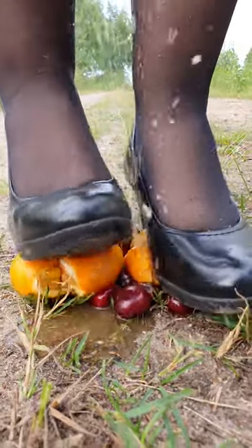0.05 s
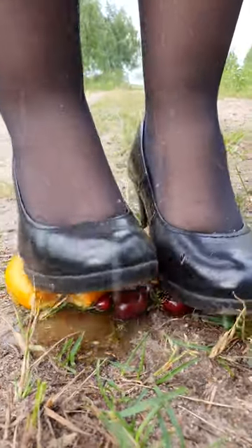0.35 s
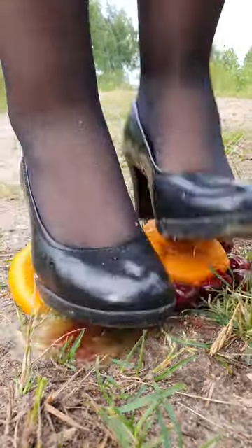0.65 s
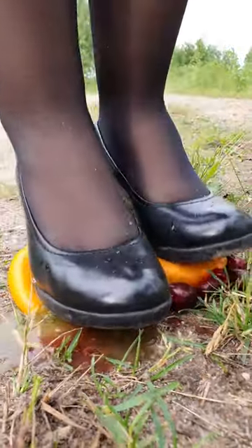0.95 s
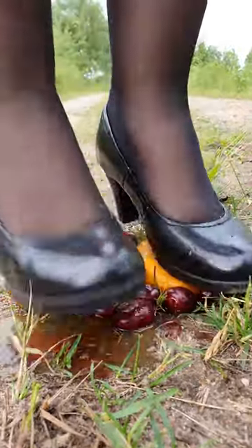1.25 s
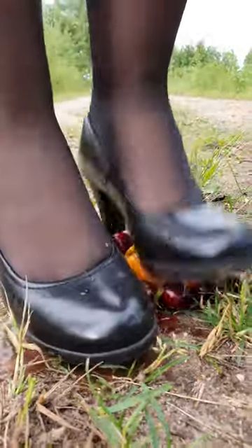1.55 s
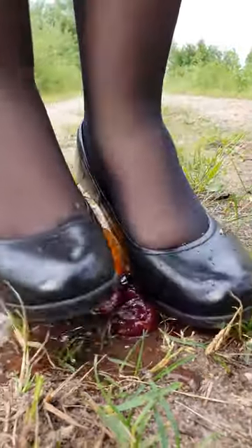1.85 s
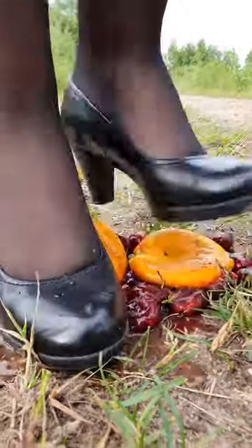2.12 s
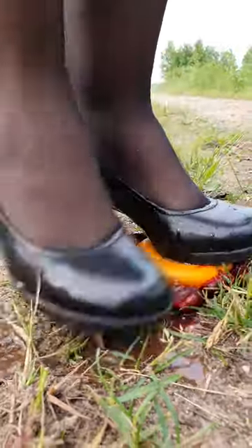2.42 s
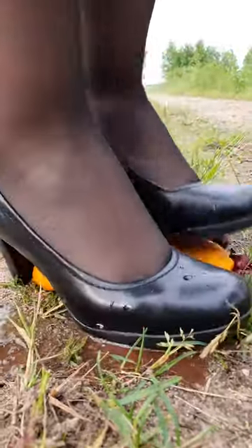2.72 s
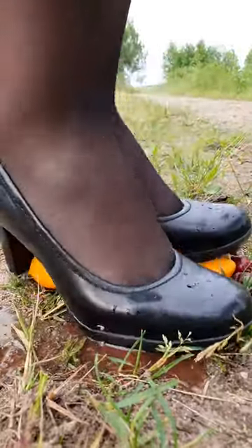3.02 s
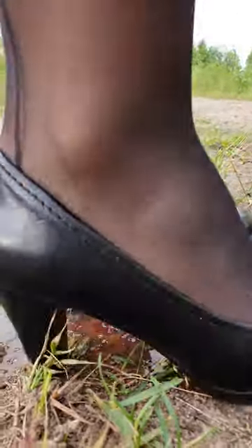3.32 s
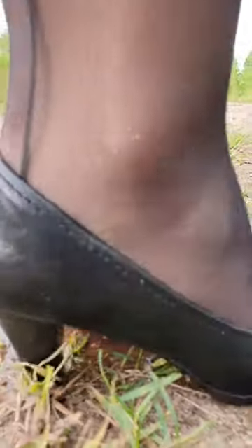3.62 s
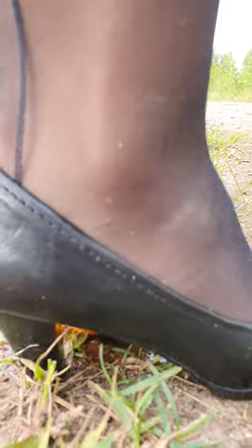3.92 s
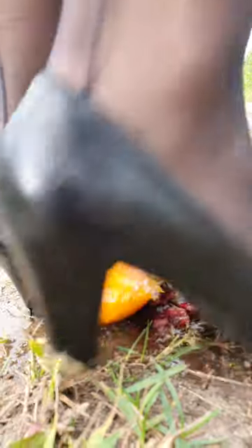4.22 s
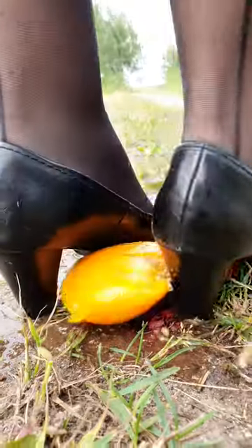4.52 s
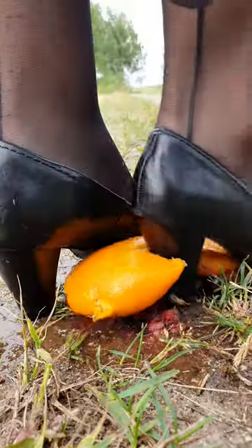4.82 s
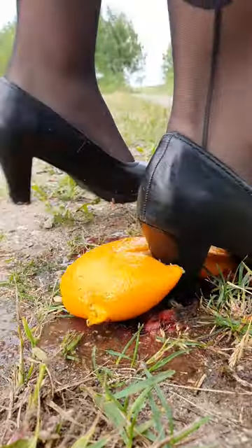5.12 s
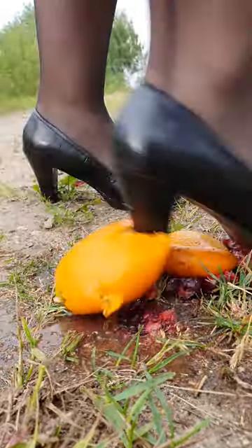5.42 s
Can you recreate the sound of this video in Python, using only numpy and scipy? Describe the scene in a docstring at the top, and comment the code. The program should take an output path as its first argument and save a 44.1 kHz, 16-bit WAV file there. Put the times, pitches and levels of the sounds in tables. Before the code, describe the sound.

High-heeled shoes squish oranges and cherries into sandy ground close by, with wet crackles, pops and heel thuds, while a small bird warbles faintly.

```python
"""High-heeled shoes tread oranges and cherries into sandy ground, close by, over a low outdoor rumble.
From the start soles grind sand, wet pulp crackles and squirts, air pockets pop and peel snaps.
A small bird warbles further off, loudest near 1 s, while a distant vehicle fades.
Heels thud at 2.0, 3.3 and 4.1 s. The treading grows lighter; the bird trills and sings on faintly."""
import sys
import numpy as np
from scipy import signal
from scipy.fft import rfft, irfft, next_fast_len
from scipy.io import wavfile
from scipy.ndimage import map_coordinates

SR = 44100
rng = np.random.default_rng(int(sys.argv[2]) if len(sys.argv) > 2 else 0)


def dump(signal):
    """Clip the signal to [-1, 1] and save it as 16-bit WAV at the path in sys.argv[1]."""
    limited = np.clip(np.atleast_2d(signal).T, -1, 1)
    pcm = np.round(limited * 32767).astype(np.int16)
    wavfile.write(sys.argv[1], SR, pcm)


N = 245195

# a foot leans on the fruit: (time [s], hold [s], sand [dB], pulp [dB], froth [dB])
FOOT_PRESSES = [(0, 0.062, -51.5, -52, -59.5), (0.147, 0.44, -68, -57.5, -75),
                (0.419, 0.086, -63, -54.5, -58), (0.531, .14, -58.5, -51.5, -60.5),
                (0.686, 0.073, -70, -58.5, -68.5), (0.803, 0.06, -64.5, -52.5, -65),
                (0.916, .29, -56, -48, -63.5), (0.977, 0.043, -69, -47.5, -60),
                (1.239, 0.13, -57.5, -54, -71), (1.379, 0.062, -60.5, -49, -53),
                (1.48, 0.22, -56.5, -48.5, -68.5), (1.731, 0.073, -57.5, -52, -66),
                (1.831, 0.011, -64, -56, -56.5), (1.94, 0.072, -51.5, -47, -61),
                (2.252, 0.009, -52, -52.5, -56), (2.307, 0.045, -59.5, -58.5, -78),
                (2.369, 0.046, -52, -50, -61.5), (2.57, 0.069, -50, -50.5, -56),
                (2.691, 0.19, -61, -59, -88), (2.913, 0.042, -56.5, -55.5, -68.5),
                (3.023, 0.17, -65, -55.5, -70.5), (3.191, 0.072, -65, -60.5, -68),
                (3.261, 0.028, -52, -58, -67), (3.378, 0.21, -61, -62.5, -79),
                (3.563, 0.042, -54, -59.5, -64), (3.675, 0.1, -64, -64, -72),
                (4.097, 0.28, -65.5, -66, -78), (4.178, 0.055, -59, -63, -69),
                (4.426, 0.03, -56, -55.5, -62.5), (4.524, 0.17, -64, -65.5, -75.5),
                (4.726, 0.12, -55, -60, -65), (4.928, 0.12, -62, -64, -77), (5.261, 0.16, -69.5, -66, -84),
                (5.386, 0.13, -60.5, -64.5, -75.5)]
# spectra under the sole: (frequency [Hz], density [dB])
SAND_SPECTRUM = [(100, -64), (220, 0.5), (400, 3.5), (750, 2.5), (1200, 2), (2000, -26), (5000, -54)]
PULP_SPECTRUM = [(400, -28), (1000, 1.5), (1600, 2.5), (2400, -2), (3300, 0.5), (4500, -2), (6500, -5.5),
                 (8000, -19), (12000, -35)]
FROTH_SPECTRUM = [(3000, -18), (6500, 11), (8200, -8), (11000, -1.5), (15500, -1.5), (17000, -7)]
# juice forced out: (time [s], level [dB], centre [Hz], width [octaves], decay [s])
JUICE_SQUIRTS = [(.003, -43.5, 2500, .94, .032), (0.193, -46.5, 2700, 1.02, 0.02),
                 (0.616, -29, 3030, 0.41, 0.0086), (0.63, -35, 3120, .65, 0.019),
                 (0.644, -40.5, 1930, 0.82, 0.023), (0.9845, -27, 3320, 0.69, 0.0059),
                 (1.1, -44, 1630, 0.69, 0.026), (1.309, -39.5, 3230, .79, .022),
                 (1.342, -36, 3520, .51, .006), (1.433, -38.5, 5870, 1.26, 0.021),
                 (1.466, -38.5, 2220, 0.48, 0.043), (1.485, -44.5, 4560, 0.077, 0.023),
                 (1.594, -37, 2590, 1.4, .019), (1.618, -41, 3150, 0.78, 0.036),
                 (1.7355, -39, 4370, .51, 0.0066), (1.943, -41, 2100, 1.35, 0.032),
                 (1.974, -38, 2350, 2.05, 0.021), (2.040, -33, 4080, 1.29, .008),
                 (2.252, -40, 2840, 0.86, 0.029), (2.322, -44, 1180, 1.5, 0.013),
                 (2.379, -36.5, 3300, 1.1, .006), (2.395, -35, 5700, 0.51, 0.0061),
                 (2.582, -46, 2390, 1.93, 0.032), (2.647, -44.5, 1620, 1.7, 0.015),
                 (2.845, -44, 1550, 1.17, 0.0081), (2.919, -26.5, 1480, 1.34, .0085),
                 (2.922, -33.5, 2960, 0.75, .011), (3.087, -41, 3500, .55, 0.0046),
                 (4.083, -37.5, 1094, 1.17, 0.011), (4.2, -45.5, 1114, 1.2, .014),
                 (4.416, -49, 1040, 0.9, 0.046), (4.426, -41.5, 4530, 0.32, .019),
                 (4.728, -48.5, 1190, 0.73, .028), (5.013, -50.5, 1930, 0.41, 0.032)]
# air pockets bursting: (peak time [s], level [dB], pitch [Hz])
AIR_POPS = [(.4294, -28, 483), (1.3144, -25, 653), (1.3195, -23, 5700), (1.3292, -19.5, 1870),
            (1.5944, -30.5, 710), (1.7481, -26.5, 3980), (1.9297, -29, 730), (1.9802, -21.5, 2040),
            (1.9963, -23, 6200), (2.2503, -24.5, 800), (2.2641, -32, 780), (2.3317, -32, 980),
            (2.6222, -28.5, 724), (2.6543, -32, 640), (2.7256, -31, 694), (2.9163, -30, 604),
            (2.9245, -22.5, 600), (2.9307, -24.5, 890), (3.772, -37.5, 725), (4.36, -43.5, 960),
            (4.939, -41.5, 816)]
# heel strikes: (time [s], thud [dB], thud [Hz], sole delay [s], sole [dB], sole [Hz])
HEEL_STRIKES = [(1.9734, -24, 214, .014, -24, 850), (3.2714, -25.5, 123, 0.023, -28, 71),
                (4.0791, -21, 215, .0088, -22, 1080)]
# peel and dry stalks breaking: (time [s], level [dB])
PEEL_SNAPS = [(0.4292, -28.5), (1.3192, -22), (1.328, -29), (1.599, -57), (4.0763, -29.5), (4.489, -33),
              (4.86, -33)]
# bird calls: (time [s], length [s], start pitch [Hz], end pitch [Hz], level [dB])
BIRD_SYLLABLES = [(.278, 0.044, 3600, 3270, -64), (.329, 0.082, 2750, 4070, -60),
                  (.732, 0.044, 4450, 3140, -51.5), (.88, 0.084, 3180, 3610, -44.5),
                  (.951, 0.036, 4320, 3640, -41.5), (1.063, 0.028, 3760, 3270, -46),
                  (1.16, 0.028, 2670, 2510, -49), (1.201, 0.029, 3040, 2960, -45.5),
                  (1.284, 0.032, 3950, 3390, -45.5), (1.408, 0.037, 4350, 3470, -48.5),
                  (1.84, 0.046, 2750, 2420, -52), (1.909, 0.016, 4540, 4150, -48),
                  (2.06, .035, 2060, 1940, -58.5), (2.117, 0.016, 3000, 2830, -63),
                  (2.744, 0.049, 2600, 4100, -62.5), (4.139, 0.03, 4100, 3350, -67),
                  (4.26, 0.043, 4650, 3900, -65), (4.863, 0.091, 2530, 4070, -64.5),
                  (5.047, 0.023, 3930, 3540, -60.5), (5.08, 0.034, 3950, 3960, -70),
                  (5.172, .03, 3970, 3530, -69.5), (5.296, .035, 3900, 3650, -66),
                  (5.333, .07, 3940, 3750, -65), (5.426, 0.03, 3900, 3500, -63)]
BIRD_TRILLS = [(3.85, 0.25, 3690, 2960, -73), (4.35, .068, 3180, 3150, -68), (4.48, .168, 3280, 3170, -68)]
# tyre noise and open-air rumble: (time [s], level [dB])
TYRE_LEVELS = [(0, -56), (1.1, -55.5), (1.8, -62.5), (2.2, -66), (5.56, -79)]
RUMBLE_LEVELS = [(0, -61.5), (1.4, -54), (2.1, -58), (2.9, -58.5), (3.65, -55), (4.5, -52), (5.15, -61.5),
                 (5.56, -58.5)]
# their spectra: (frequency [Hz], density [dB])
TYRE_SPECTRUM = [(200, 6.5), (500, -44), (750, -7), (980, 5), (1300, -9), (3000, -46), (8000, -42)]
RUMBLE_SPECTRUM = [(15, -31), (30, -4.5), (48, 1.5), (75, 4.5), (110, -3), (165, -5), (240, -18.5),
                   (500, -30.5), (1500, -57)]
# scatter off grass and legs: (frequency [Hz], T60 [s])
SCATTER_DECAY = [(200, 0.091), (2000, 0.1), (10000, 0.065)]
# left-right likeness: (frequency [Hz], correlation [ratio])
STEREO_CORRELATION = [(30, 0.99), (120, 0.94), (500, 0.93), (1000, 0.77), (2000, 0.67), (4000, 0.18),
                      (8000, 0.33), (14000, 0.11)]
# microphone balance: (frequency [Hz], right minus left [dB])
MIC_BALANCE = [(100, 1), (400, 2.5), (1000, 2), (2000, 6), (4000, 5.5), (7000, 26), (11000, 3),
               (15000, -0.5)]


def treading():
    """Under the soles sand grinds, pulp hisses with a few stronger bubbles, juice fizzes in clumps."""
    _, _, sand_db, pulp_db, froth_db = np.transpose(FOOT_PRESSES)
    grit = grains(N, per_s=900, hz=666, octaves=1, cycles=0.8, scatter_db=4)
    bubbles = grains(N, per_s=5000, hz=3000, octaves=0.9, cycles=2, scatter_db=2.5)
    bubbles += 0.6 * grains(N, per_s=70, hz=2800, octaves=0.7, cycles=4, scatter_db=3.5)
    fizz = grains(N, per_s=1500, hz=11100, octaves=0.322, cycles=24, scatter_db=2)
    sand = coloured(grit + 1.4 * noise(), SAND_SPECTRUM)
    pulp = coloured(bubbles + 0.8 * noise(), PULP_SPECTRUM)
    froth = coloured(fizz + 0.63 * noise(), FROTH_SPECTRUM)
    sand *= pressure(sand_db, rest_db=-70.5, release_db_per_s=199)
    pulp *= pressure(pulp_db, rest_db=-75, release_db_per_s=199)
    froth *= pressure(froth_db, rest_db=-90, release_db_per_s=256)
    clumps = wobble(35)
    return sand * amp(2.07 * clumps) + pulp * amp(1.47 * clumps) + froth * amp(4.3 * clumps)


def pressure(levels_db, rest_db, release_db_per_s, attack_s=0.015, sag_db_per_s=18):
    """Gain over all presses: the weight comes on, the fruit slowly gives way, the foot lets go."""
    power = np.full(N, amp(rest_db) ** 2)
    for (s, hold_s, *_), db in zip(FOOT_PRESSES, levels_db):
        t = np.arange(N) / SR - s
        rise = np.clip(t / attack_s + 0.5, 0, 1)
        fall_db = sag_db_per_s * np.clip(t, 0, hold_s) + release_db_per_s * np.maximum(t - hold_s, 0)
        power += (rise * amp(db - fall_db)) ** 2
    return np.sqrt(power)


def grains(size, per_s, hz, octaves, cycles, scatter_db):
    """Tiny bubbles or slipping grains: random damped sines, rising slightly in pitch as they die."""
    count = int(per_s * size / SR) + 1
    start = rng.integers(0, size, (count, 1))
    pitch_hz = np.clip(hz * 2 ** (octaves * rng.standard_normal((count, 1))), 150, SR / 2.5)
    strength = amp(scatter_db * np.minimum(rng.exponential(size=(count, 1)), 4)) * np.sqrt(pitch_hz)
    step = np.arange(192)
    age = step / len(step)
    turns = pitch_hz * step / SR * (1 + 0.11 * age)
    envelope = strength * np.exp(-turns / cycles) * (1 - np.exp(-2 * turns)) * (1 - age)
    waves = envelope * np.sin(2 * np.pi * turns)
    positions = (start + step).ravel()
    pair = [waves * rng.choice([-1, 1], (count, 1)) for _ in range(2)]
    return unit_rms(np.array([np.bincount(positions, x.ravel(), size)[:size] for x in pair]))


def squirts(tear_s=0.0019):
    """A tearing cell spits bubbles; sound bouncing in the wet gap under the sole gives a hollow pitch."""
    out = np.zeros((2, N))
    damping_db = [(150, 13), (400, 3), (6500, -1.5), (8000, -11), (15000, -0.5)]
    for s, db, hz, octaves, decay_s in JUICE_SQUIRTS:
        def wet_gap(f):
            band = 1 / np.hypot(1, np.log2((f + 1) / hz) / (1.5 * octaves))
            bounce = 1 / (1 - 0.35 * np.exp(-4j * np.pi * f / hz))
            return amp(at_hz(damping_db, f)) * band * bounce
        t = np.arange(int(3 * decay_s * SR)) / SR
        bubbles = grains(len(t), per_s=6000, hz=hz, octaves=octaves, cycles=1.73, scatter_db=3)
        envelope = (1 - np.exp(-t / tear_s)) * np.exp(-(t / (1.09 * decay_s)) ** 2)
        add(out, s, amp(db) * envelope * unit_rms(filtered(bubbles, wet_gap)))
    return out


def pops():
    """Air pockets in the fruit burst, each with one damped swing."""
    return swings(AIR_POPS)


def heels(touch_lead_s=0.00708, touch_hz=603, knock_hz=384):
    """The tip touches; the ground thuds and the heel knocks together; the sole follows."""
    out = np.zeros((2, N))
    for s, db, thud_hz, delay_s, sole_db, sole_hz in HEEL_STRIKES:
        touch = (s - touch_lead_s, db - 13.5, touch_hz)
        thud = (s, db, thud_hz)
        knock = (s, db - 7.5, knock_hz)
        sole = (s + delay_s, sole_db, sole_hz)
        out += swings([touch, thud, knock, sole])
    return out


def swings(rows, lead_s=0.02):
    """One heavily damped swing per (time [s], level [dB], pitch [Hz]); high ones ring more cycles."""
    out = np.zeros((2, N))
    t = np.arange(SR // 10) / SR - lead_s
    for s, db, hz in rows:
        turns, cycles = hz * t, 0.31 + hz / 4500
        envelope = np.where(turns < 0, np.exp(-(turns / 0.45) ** 2), np.exp(-np.abs(turns) / cycles))
        phase = 2 * np.pi * turns
        add(out, s - lead_s, amp(db) * envelope * np.array([np.cos(phase), np.sin(phase)]))
    return out


def snaps(decay_s=0.00041):
    """A fibre breaks: a bright crack about a millisecond long."""
    out = np.zeros((2, N))
    t = np.arange(SR // 100) / SR
    for s, db in PEEL_SNAPS:
        add(out, s, amp(db - 7) * np.exp(-t / decay_s) * noise(len(t)))
    return out


def bird(trill_hz=62, flutter_db=3.5):
    """Warbled syllables and pulsed trills, roughened by the air and echoed by the trees."""
    pulses = 2 * np.sin(np.pi * trill_hz * np.arange(N) / SR) ** 4
    song = whistles(BIRD_SYLLABLES) + pulses * whistles(BIRD_TRILLS)
    song *= unit_rms(amp(flutter_db * wobble(180)))
    return song + amp(-4.5) * echo(song, t60_s=[(2000, 0.25), (6000, 0.35)])


def whistles(rows, arch_hz=130, waver_hz=76):
    """Each syllable is an arched glide that swells and fades, its pitch slightly unsteady."""
    song = np.zeros(N)
    drift_hz = waver_hz * wobble(350)
    for s, length_s, from_hz, to_hz, db in rows:
        progress = np.linspace(0, 1, int(length_s * SR))
        arch = np.abs(np.sin(np.pi * progress))
        pitch_hz = from_hz + (to_hz - from_hz) * progress + arch_hz * arch
        pitch_hz += np.roll(drift_hz, -round(s * SR))[:len(progress)]
        add(song, s, amp(db + 1.5) * np.sqrt(arch) * np.sin(2 * np.pi * np.cumsum(pitch_hz) / SR))
    return song


def vehicle(hum_hz=110.9, hum_db=-51, distance_doubled_s=1.08):
    """Engine hum and tyre noise fade as a distant vehicle drives off."""
    tyres = gain_curve(TYRE_LEVELS) * coloured(noise(), TYRE_SPECTRUM)
    phase = 2 * np.pi * np.cumsum(hum_hz + 2.71 * wobble(5)) / SR
    distance = 1 + np.arange(N) / SR / distance_doubled_s
    hum = amp(hum_db + 1.96 * wobble(7.7)) / distance * np.sin(phase)
    return spread(tyres) + hum


def open_air(breeze_db=-8.5):
    """Low outdoor rumble, plus air stirring at each microphone on its own."""
    rumble = spread(coloured(noise(), RUMBLE_SPECTRUM))
    gusts = amp(breeze_db + 2.8 * wobble(6))
    breeze = gusts * coloured(noise(), [(20, -18), (55, 1), (150, -14.5), (600, -49)])
    return gain_curve(RUMBLE_LEVELS) * (rumble + breeze)


def echo(x, t60_s):
    """Diffuse stereo tail; each frequency dies at its own rate."""
    hz, t, spectra = signal.stft(noise(SR // 2), SR, nperseg=256)
    decay = amp(-60 * t / at_hz(t60_s, hz)[:, None])
    _, tail = signal.istft(spectra * decay, SR, nperseg=256)
    return signal.fftconvolve(x[None], tail / np.linalg.norm(tail[0]), axes=1)[:, :N]


def spread(pair):
    """Two unrelated signals become left and right, alike in the bass, unlike in the treble."""
    side_gain = lambda hz: np.tan(np.arccos(at_hz(STEREO_CORRELATION, hz)) / 2)
    mid, side = filtered(pair, lambda hz: np.array([np.ones_like(hz), side_gain(hz)]))
    return np.array([mid + side, mid - side])


def amp(db):
    return 10 ** (np.asarray(db) / 20)


def unit_rms(x):
    return x / np.sqrt(np.mean(x ** 2) + 1e-20)


def noise(size=N):
    return rng.standard_normal((2, size))


def at_hz(points, hz):
    """Interpolate (frequency [Hz], value) on a log axis."""
    knots_hz, values = np.transpose(points)
    return np.interp(np.log(hz + 1), np.log(knots_hz + 1), values)


def gain_curve(points):
    """Gain per sample from (time [s], level [dB])."""
    return amp(np.interp(np.arange(N) / SR, *np.transpose(points)))


def wobble(knots_per_s):
    """Smooth random curve."""
    knots = rng.standard_normal(int(N * knots_per_s / SR) + 4)
    return map_coordinates(knots, [np.arange(N) * knots_per_s / SR])


def filtered(x, response):
    """Apply the gain response(frequency [Hz])."""
    size = x.shape[-1]
    padded = next_fast_len(size + 4096)
    return irfft(rfft(x, padded) * response(np.fft.rfftfreq(padded, 1 / SR)), padded)[..., :size]


def coloured(pair, spectrum):
    """Shape by (frequency [Hz], gain [dB]), at rms 1."""
    return unit_rms(filtered(pair, lambda hz: amp(at_hz(spectrum, hz))))


def add(track, s, sound):
    """Mix in from time s."""
    start = max(round(s * SR), 0)
    part = track[..., start:start + sound.shape[-1]]
    part += sound[..., :part.shape[-1]]


def scene(scatter_hz=600):
    """Feet and fruit close by; grass and legs scatter their short waves; bird, vehicle and air beyond."""
    feet = treading() + squirts() + pops() + heels() + snaps()
    scattered = filtered(echo(feet[0], SCATTER_DECAY), lambda hz: hz ** 2 / (hz ** 2 + scatter_hz ** 2))
    return spread(feet) + amp(-9) * scattered + bird() + vehicle() + open_air()


def record(dry):
    """The right microphone hears more and a moment sooner; the deepest bass and the top are cut."""
    left_lag_s, low_cut_hz, top_hz = 2e-5, 36, 16000
    def microphones(hz):
        balance_db = at_hz(MIC_BALANCE, hz)
        gains = amp(np.array([-balance_db, balance_db]) / 2)
        lag = np.exp(-2j * np.pi * hz * np.array([[left_lag_s], [0]]))
        low_cut = hz ** 2 / np.hypot(hz ** 2, low_cut_hz ** 2)
        return gains / gains.mean(axis=0) * lag * low_cut * (hz < top_hz)
    return filtered(dry, microphones)


dry = scene()
out = record(dry)
dump(out)
```